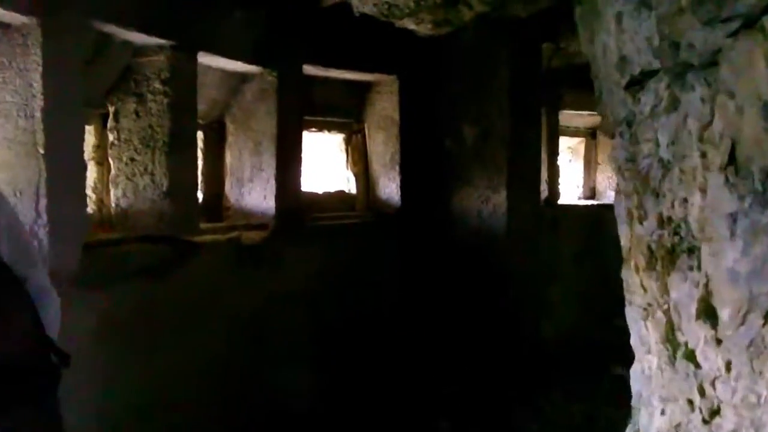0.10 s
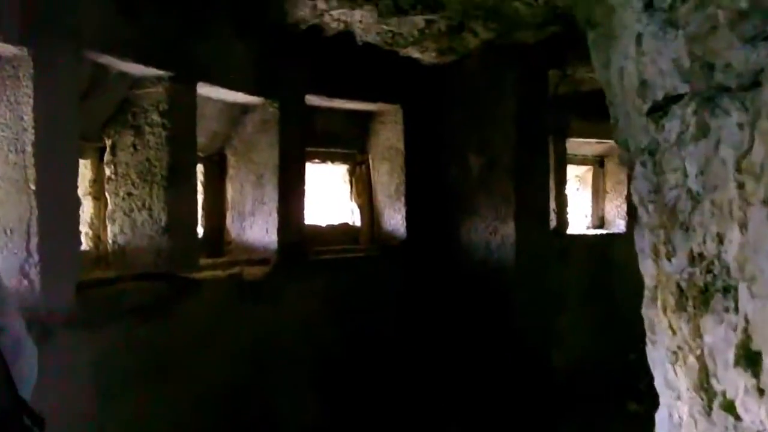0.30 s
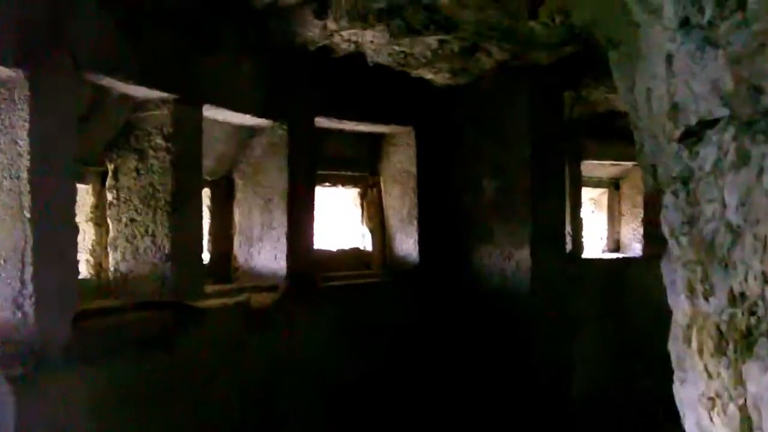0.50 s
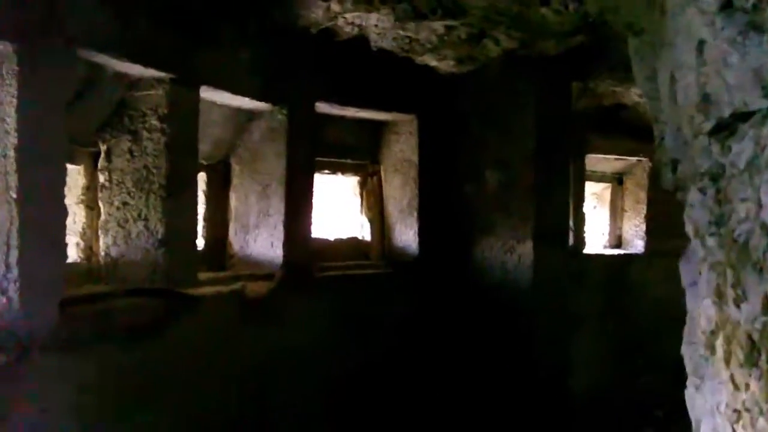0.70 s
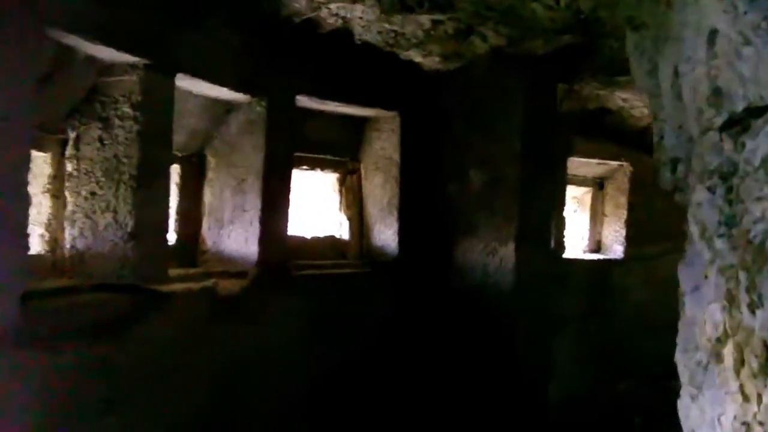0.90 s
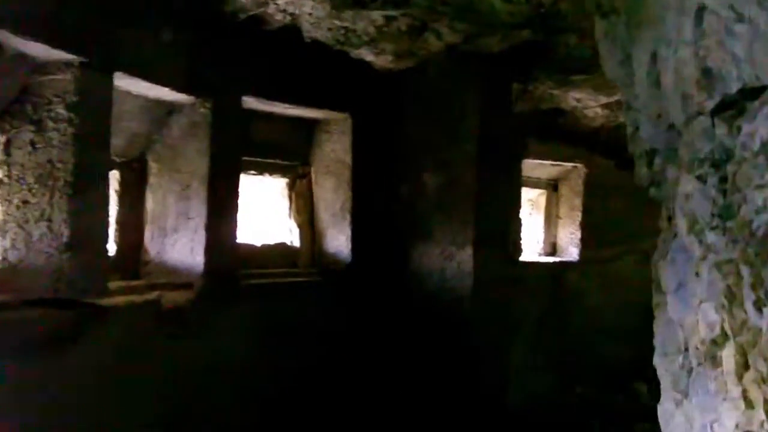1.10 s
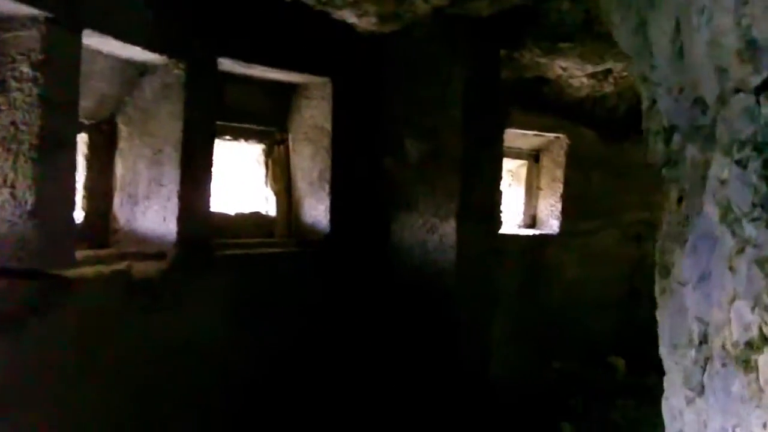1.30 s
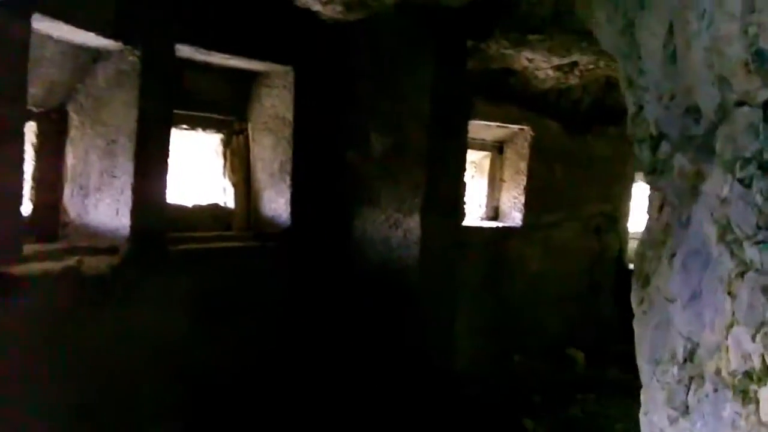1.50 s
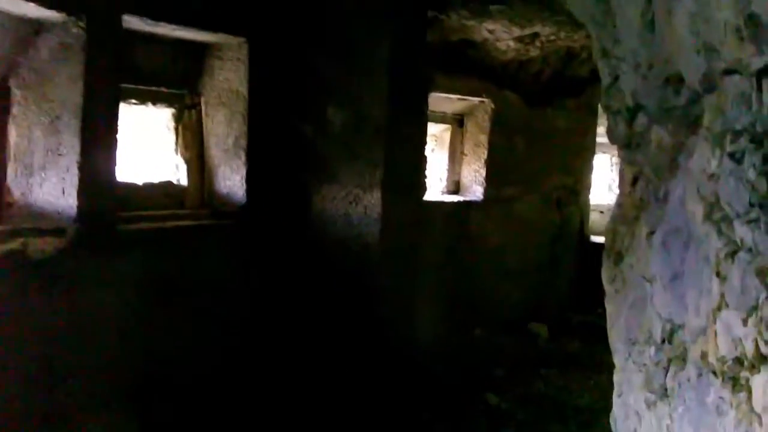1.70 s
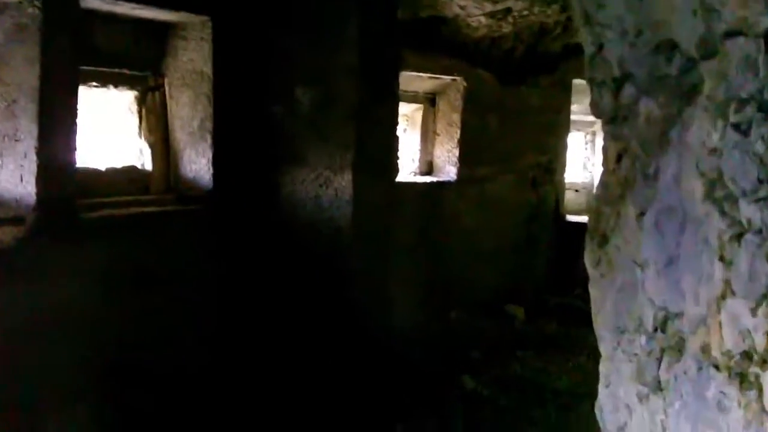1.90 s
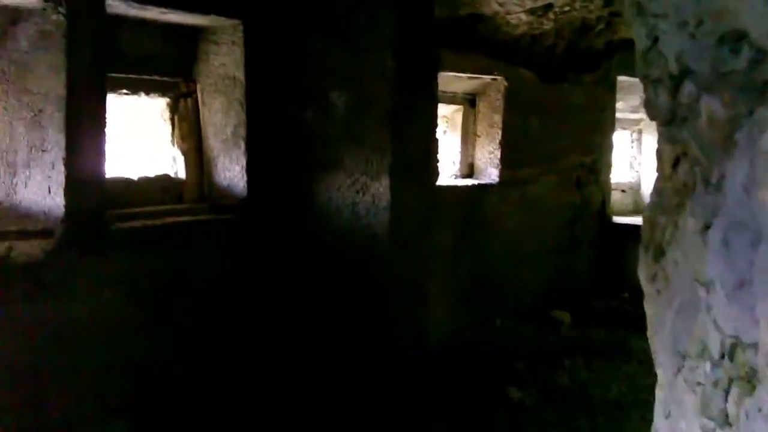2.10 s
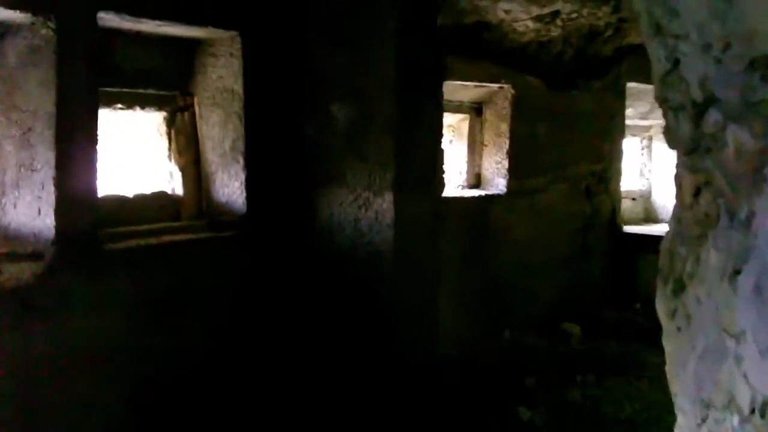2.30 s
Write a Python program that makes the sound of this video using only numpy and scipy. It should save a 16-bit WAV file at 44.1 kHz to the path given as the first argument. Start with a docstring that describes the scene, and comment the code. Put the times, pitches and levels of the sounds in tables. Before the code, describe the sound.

Boots tread on rubble in three main groups, stones clacking and gravel grinding under the soles, close and left only; dull rock reverberation, low thuddy rumble, and quiet microphone hiss with a thin whine.

```python
"""Boots on rubble in a rock tunnel, heard in the left channel only; circuit hiss and faint whine in both.
From the start, hiss (shaped noise), whine (steady sines), rumble (wavering low noise) and scuff (dense
grains) run throughout; the last two swell near 0.4, 1.2 and 2.1 s. From 0.13 s, bursts of crunching grains
and knocking stones (choked damped tones) come in groups, hardest near 0.3, 1.03 and 2.0 s; the rock
answers them with a short dull tail of decaying noise."""
import sys
import numpy as np
from scipy import signal
from scipy.fft import rfft, irfft, next_fast_len
from scipy.io import wavfile
from scipy.ndimage import map_coordinates

SR = 44100
rng = np.random.default_rng(int(sys.argv[2]) if len(sys.argv) > 2 else 0)


def master(y):
    """Save y as 16-bit WAV."""
    cut = np.clip(np.atleast_2d(y).T, -1, 1)
    pcm = np.round(cut * 32767)  # scale
    wavfile.write(sys.argv[1], SR, pcm.astype(np.int16))


def level_to_linear(level):
    """Convert decibel levels to linear amplitude factors, elementwise."""
    exponent = np.asarray(level, float) / 20
    return 10 ** exponent


N = 103635
GROUND_GAIN_DB = 7  # on scuff and rumble
MAINS_HZ, CLOCK_HZ = 60, 1955.5


def unit(x):
    """Scale to rms 1."""
    return x / np.sqrt(np.mean(x ** 2) + 1e-20)


def along(points, hz):
    """Interpolate (Hz, value) points on a log frequency axis."""
    f, v = np.transpose(points)
    return np.interp(np.log(hz + 1), np.log(f + 1), v)


def curve(rows):
    """Interpolate (s, value) rows to one value per sample."""
    s, value = np.transpose(rows)
    return np.interp(np.arange(N) / SR, s, value)


def wobble(knots_per_s):
    """Smooth random curve through normal knots."""
    knots = rng.standard_normal(int(N * knots_per_s / SR) + 4)
    return map_coordinates(knots, [np.arange(N) * knots_per_s / SR])


def filtered(x, response):
    """Multiply the spectrum of x by a response of frequency in Hz."""
    m = next_fast_len(N + 8192)
    return irfft(rfft(x, m) * response(np.fft.rfftfreq(m, 1 / SR)), m)[..., :N]


def grains(count, hz, octaves, cycles, scatter_db, span=N, size=600):
    """Short damped tones of scattered pitch and level at random moments, rms 1; span, size in samples."""
    u = rng.random((count, 2))
    pitch_hz = np.clip(hz * 2 ** (octaves * rng.standard_normal((count, 1))), 60, 14000)
    turns = np.arange(size) / SR * pitch_hz
    level = level_to_linear(-scatter_db * np.log(u[:, 1:] + 0.0017))
    envelope = turns * np.exp(-2 * turns / cycles)
    tones = level * envelope * np.sin(2 * np.pi * turns)
    at = (u[:, :1] * span).astype(int) + np.arange(size)
    return unit(np.bincount(at.ravel(), tones.ravel(), span + size)[:span])


# Sole dragging in rubble. Each row: time in seconds, level in dB before GROUND_GAIN_DB.
SCUFF_LEVEL = [(0.0, -62), (0.1, -60), (0.19, -56.5), (0.33, -45), (0.41, -43), (0.56, -53), (0.8, -66),
               (1.05, -64.5), (1.19, -49.5), (1.41, -56.5), (1.8, -65.5), (1.97, -59.5), (2.1, -48),
               (2.35, -62.5)]


def scuff():
    """Stones roll under the moving sole: dense grains, level wavering slightly at random."""
    stones = grains(count=3000, hz=311.5, octaves=0.655, cycles=1.83, scatter_db=2.05, size=1200)
    wavering = unit(level_to_linear(1.2 * wobble(25)) * stones)
    return level_to_linear(GROUND_GAIN_DB + curve(SCUFF_LEVEL)) * wavering


# Ground rumble. Each row: time in seconds, level in dB before GROUND_GAIN_DB.
RUMBLE_LEVEL = [(0.0, -52.5), (0.16, -62.5), (0.42, -48), (0.85, -63.5), (1.03, -71), (1.2, -53.5),
                (1.45, -65), (1.79, -59.5), (2.0, -64), (2.16, -48), (2.35, -54.5)]
# Rumble spectrum. Each row: frequency in Hz, relative level in dB.
RUMBLE_SPECTRUM = [(15, 21), (35, -2.5), (90, 3.5), (140, 5), (250, -58), (600, -58)]


def rumble():
    """Low noise carried by the rock, level wavering slightly at random."""
    low = filtered(rng.standard_normal(N), lambda hz: level_to_linear(along(RUMBLE_SPECTRUM, hz)))
    wavering = unit(low * level_to_linear(1.5 * wobble(12)))
    return level_to_linear(GROUND_GAIN_DB + curve(RUMBLE_LEVEL)) * wavering


# Circuit hiss spectrum. Each row: frequency in Hz, relative density in dB per Hz.
HISS_SPECTRUM = [(10, -9), (25, -2), (70, 1.5), (150, -1.5), (300, -6), (600, -11), (1200, -14.5),
                 (2500, -20), (5000, -26.5), (9000, -29), (13000, -29.5), (14800, -33.5), (15300, -30)]
# Hiss level ahead of the circuit response: left rms in dB, right rms in dB.
HISS_RMS_DB = [-52, -53]


def hiss():
    """Circuit noise: independent shaped noise in each channel."""
    noise = filtered(rng.standard_normal((2, N)), lambda hz: level_to_linear(along(HISS_SPECTRUM, hz)))
    return level_to_linear(np.c_[HISS_RMS_DB]) * unit(noise)


# Whine tones. Each row: multiple of CLOCK_HZ, steps of MAINS_HZ beside it.
WHINE_TONES = [(3, 0), (4, -2), (4, -1), (4, 0), (4, 1), (4, 2), (4, 3), (5, 0), (5, 1), (6, 1)]
# Whine levels, one row per tone. Each row: left rms in dB, right rms in dB.
WHINE_RMS_DB = [(-87, -110), (-94, -99), (-88, -96), (-84, -90), (-83, -91), (-93, -99), (-93, -102),
                (-84, -110), (-79, -105), (-89, -110)]


def whine():
    """Steady sines at clock multiples and mains steps beside them, in phase across channels."""
    t = np.arange(N) / SR
    out = np.zeros((2, N))
    for (multiple, step), rms_db in zip(WHINE_TONES, WHINE_RMS_DB):
        hz = multiple * CLOCK_HZ + step * MAINS_HZ
        tone = np.sqrt(2) * np.sin(2 * np.pi * (hz * t + rng.random()))
        out += level_to_linear(np.c_[list(rms_db)]) * tone
    return out


# Clock dips. Each row: multiple of CLOCK_HZ, depth in dB, half width in Hz.
CLOCK_DIPS = [(1, 8, 253), (2, 8, 324), (3, 7.5, 354), (4, 8.5, 350)]


def circuit(x):
    """The circuit's response dips at clock multiples and ends at 15280 Hz."""
    def response(hz):
        dip_db = sum(db / (1 + ((hz - k * CLOCK_HZ) / width_hz) ** 2) for k, db, width_hz in CLOCK_DIPS)
        return (hz < 15280) * level_to_linear(-dip_db)
    return filtered(x, response)


# Grit crushed. Each row: start in seconds, rms in dB before rise and decay, t60 in seconds,
# grain pitch in Hz, pitch spread in octaves.
GRIT = [(0.131, -41.5, 0.3, 850, 0.47), (.157, -41, 0.25, 630, 0.4), (0.215, -40, 0.21, 885, 0.46),
        (.216, -58, 0.046, 2530, 0.46), (.29, -38.5, 0.24, 520, 0.6), (.330, -34, .12, 870, 0.52),
        (0.329, -51.5, 0.15, 4700, 0.24), (.333, -47, 0.083, 8200, 0.21), (.441, -40, 0.29, 600, 0.65),
        (.476, -48.5, 0.41, 1170, 0.46), (.758, -46, 0.2, 1165, .4), (.760, -40, 0.18, 443, 0.59),
        (0.761, -52, 0.14, 7400, 0.28), (1.029, -39.5, 0.45, 405, 0.66), (1.021, -36.5, 0.11, 866, 0.36),
        (1.023, -39, 0.056, 3170, 0.28), (1.026, -52, 0.12, 7000, 0.56), (1.050, -50, 0.084, 3450, 0.28),
        (1.075, -51.5, 0.05, 7500, 0.27), (1.150, -52.5, 0.45, 2780, 0.42), (1.149, -59, 0.14, 7060, 0.3),
        (1.21, -43.5, 0.57, 821, 0.62), (1.264, -36.5, 0.22, 934, 0.57), (1.268, -46, 0.06, 3200, 0.4),
        (1.261, -54, .25, 6600, 0.46), (1.659, -48, 0.29, 524, 0.45), (1.999, -28.5, 0.05, 690, 0.48),
        (2.021, -41.5, 0.14, 544, 0.32), (2.14, -49.5, 0.096, 2920, 0.2), (2.139, -61.5, 0.25, 6100, 0.25),
        (2.144, -42.5, 0.19, 1040, .4), (2.211, -51.5, 0.18, 1180, 0.38), (2.21, -60, 0.13, 9520, .2)]


def crunches():
    """Crushed grit: swarms of small grains that burst and die, cut off at 0.25 s."""
    rise_s = 0.0014
    out, t = np.zeros(N + SR), np.arange(SR // 4) / SR
    for s, db, t60, hz, spread in GRIT:
        swarm = grains(count=int(300 + hz / 4), hz=hz, octaves=spread, cycles=1.26, scatter_db=2.5,
                       span=len(t), size=500)
        burst = (1 - np.exp(-t / rise_s)) * level_to_linear(db - 60 * t / t60)
        out[round(s * SR):][:len(t)] += swarm * burst
    return out[:N]


# Stones knocking under the sole. Each row: start in seconds, peak in dB, pitch in Hz, t60 in seconds,
# rise in seconds.
STONES = [(.133, -30.5, 450, 0.034, 0.00076), (.140, -35, 182, 0.031, 0.002),
          (.157, -36, 547, 0.018, 0.00091), (.165, -34, 233, 0.026, 0.0013),
          (.215, -19.5, 462, 0.013, 0.001), (.241, -34.5, 395, 0.026, .002),
          (.292, -29.5, 300, 0.011, 0.0018), (0.2944, -16.5, 232, 0.028, 0.01),
          (.313, -30, 200, 0.031, 0.0037), (.329, -19, 487, 0.016, 0.0013), (.335, -17, 205, 0.017, 0.002),
          (.345, -20, 182, 0.021, 0.003), (.378, -33, 118, 0.11, 0.0027), (.408, -39, 240, 0.054, 0.0047),
          (.440, -28, 337, 0.023, .001), (.476, -33.5, 1033, 0.012, 0.00031), (.51, -35, 119, 0.069, 0.004),
          (0.541, -36.5, 210, .05, 0.0015), (.572, -41, 45.3, 0.054, 0.0033),
          (.764, -43, 1300, 0.039, 0.0011), (.223, -31.5, 202, 0.038, 0.0022),
          (.762, -29, 115, 0.037, 0.0036), (.992, -39, 60, 0.083, 0.007), (1.018, -24.5, 129, 0.028, .005),
          (1.027, -24, 492, 0.0087, 0.00017), (1.052, -31, 581, 0.027, 0.0017),
          (1.068, -32, 568, 0.029, 0.0015), (1.080, -28, 97.4, 0.032, 0.0043),
          (1.152, -35.5, 70, 0.049, 0.0035), (1.186, -43, 2380, 0.013, .0003),
          (1.237, -41, 3270, 0.0084, .0003), (1.053, -45, 3500, .012, 0.00033),
          (1.268, -44, 2970, 0.0063, 0.00027), (1.292, -42, 1060, 0.016, .0005),
          (1.181, -36.5, 59.4, 0.047, 0.0022), (1.215, -36.5, 66, 0.028, 0.0039),
          (1.236, -33, 556, 0.03, 0.0011), (1.264, -27, 556, 0.0091, 0.0014),
          (1.277, -33.5, 915, 0.021, 0.0012), (1.322, -36, 44.5, 0.085, 0.0042),
          (2.0004, -16.5, 261, 0.016, 0.00048), (2.0033, -20, 341, 0.018, 0.00067),
          (2.008, -20, 80, 0.026, 0.0033), (2.028, -52, 215, 0.06, .003), (2.068, -56, 97, 0.09, 0.0039),
          (2.138, -32.5, 970, 0.011, 0.0016), (2.152, -43, 1406, 0.014, 0.00042),
          (2.21, -41.5, 1338, 0.023, .001), (2.245, -34, 65, 0.04, 0.0016), (2.272, -36, 90, 0.041, 0.0021)]
# Stone overtones. Each row: ratio to the pitch, mean level in dB re the fundamental.
STONE_OVERTONES = [(1.698, -13), (2.6, -25.5)]


def knocks():
    """Each stone gives a few soft-edged cycles, choked by the sole."""
    fade_bend = 1.49  # over 1: decay speeds up
    out, t = np.zeros(N + SR), np.arange(SR // 5) / SR
    for s, peak_db, hz, t60, rise_s in STONES:
        tone = np.sin(2 * np.pi * hz * t)
        for ratio, db in STONE_OVERTONES:
            tone += level_to_linear(db + rng.normal(0, 2)) * np.sin(2 * np.pi * ratio * hz * t)
        rise = (1 - np.exp(-t / rise_s)) ** 2
        ring = rise * level_to_linear(-60 * (t / t60) ** fade_bend) * tone
        out[round(s * SR):][:len(t)] += level_to_linear(peak_db) * ring / np.abs(ring).max()
    return out[:N]


# Rock decay. Each row: frequency in Hz, t60 in seconds.
ROCK_T60 = [(100, 0.57), (400, .4), (1500, 0.44), (8000, 0.18)]


def tunnel(x):
    """The rock's answer: noise whose frequencies die at their own speeds, 300 samples late."""
    hz, t, z = signal.stft(rng.standard_normal(SR // 2), SR, nperseg=512)
    decay = level_to_linear(-60 * t / along(ROCK_T60, hz)[:, None])
    tail = signal.istft(z * decay, SR, nperseg=512)[1]
    return signal.fftconvolve(np.pad(x, (300, 0)), tail / np.linalg.norm(tail))[:N]


def scene():
    """Ground and steps with the rock's answer, left channel only."""
    ground = scuff() + rumble()
    steps = crunches() + knocks()
    rock_db = -9.5
    left = ground + steps + level_to_linear(rock_db) * tunnel(steps)
    return np.array([left, np.zeros(N)])


def band_limit(x):
    """A steep low-pass at the top of the band."""
    return signal.sosfilt(signal.butter(12, 15490, fs=SR, output="sos"), x)


def record(dry):
    """Hiss joins the scene ahead of the circuit's response, whine after it."""
    mix = circuit(dry + hiss()) + whine()
    return band_limit(mix)


dry = scene()
out = record(dry)
master(out)
```